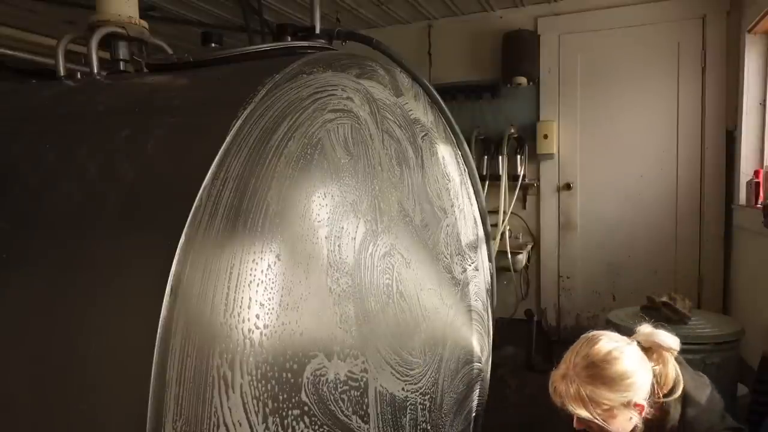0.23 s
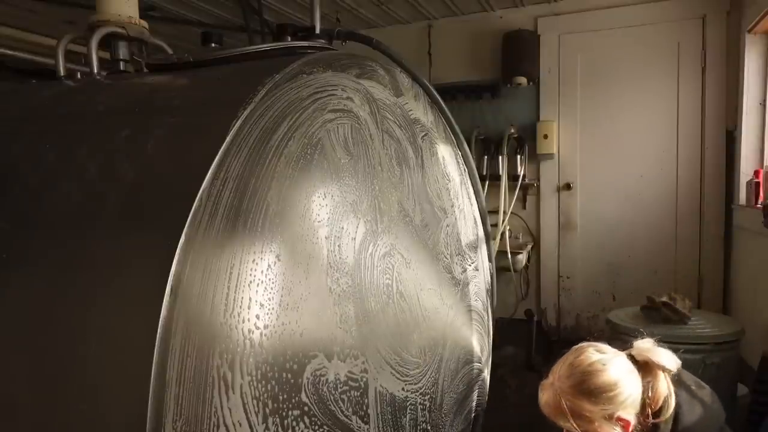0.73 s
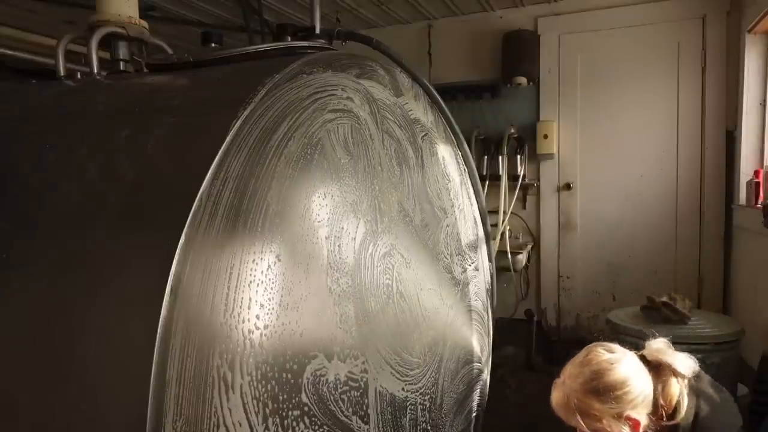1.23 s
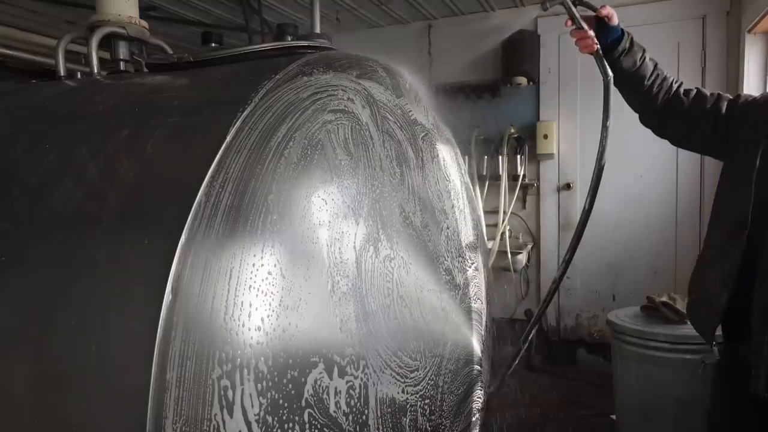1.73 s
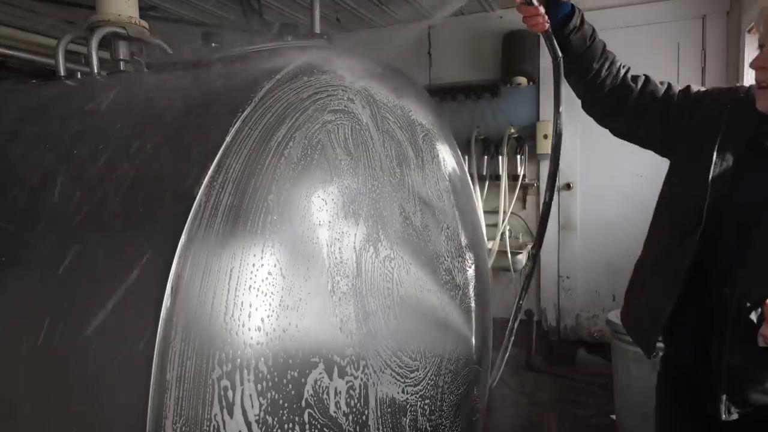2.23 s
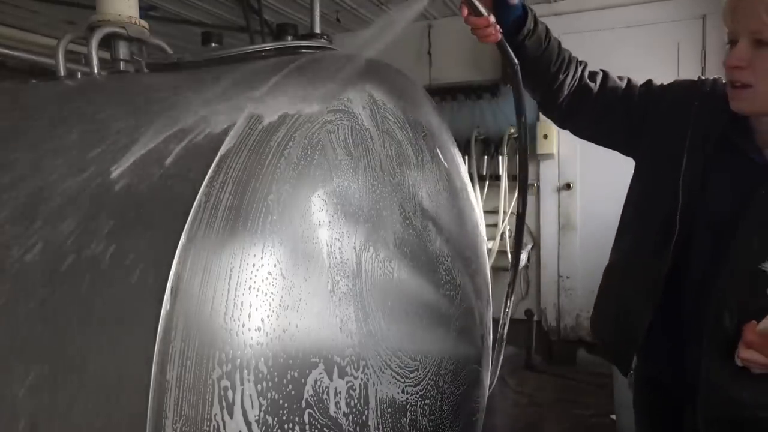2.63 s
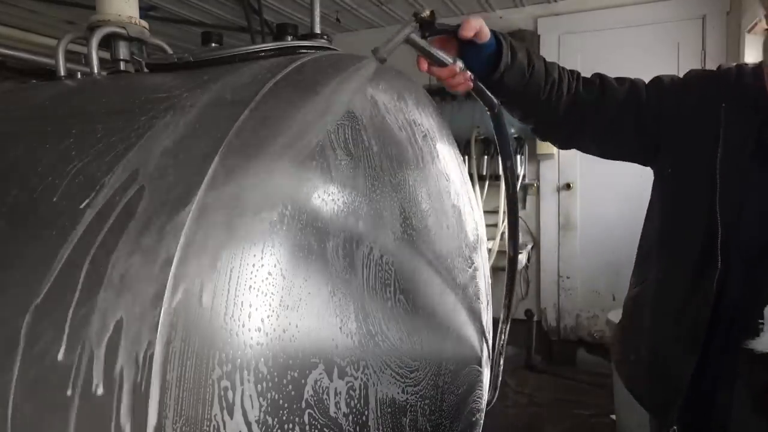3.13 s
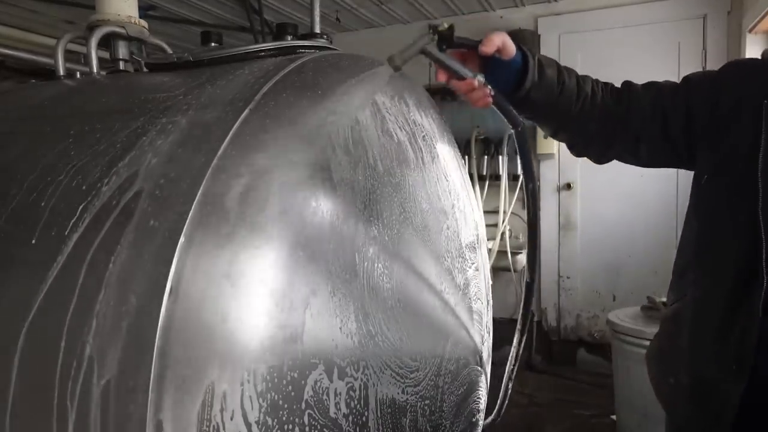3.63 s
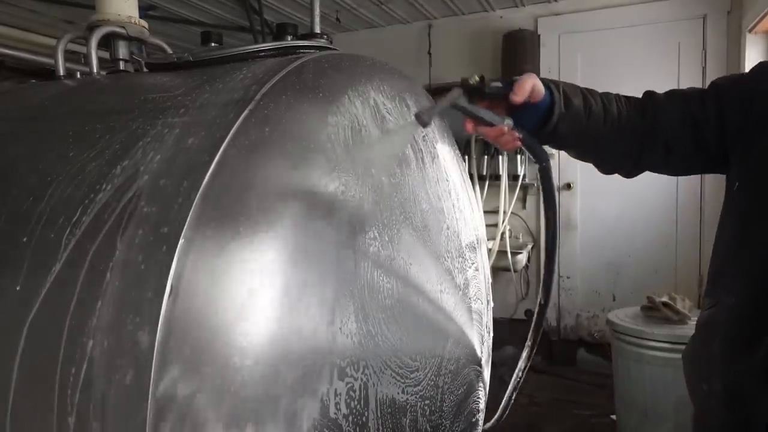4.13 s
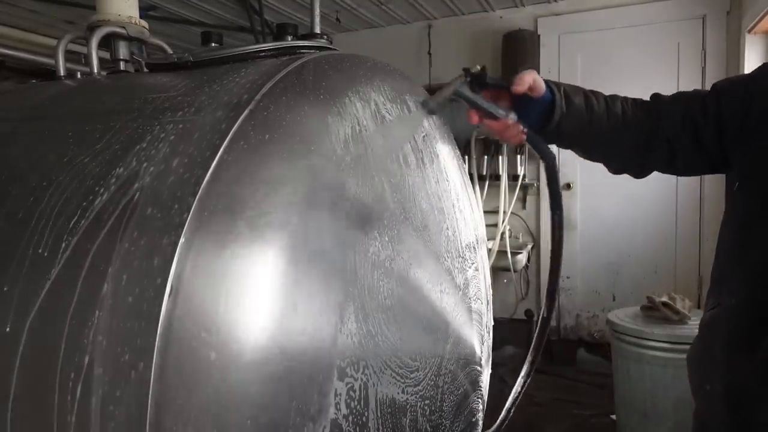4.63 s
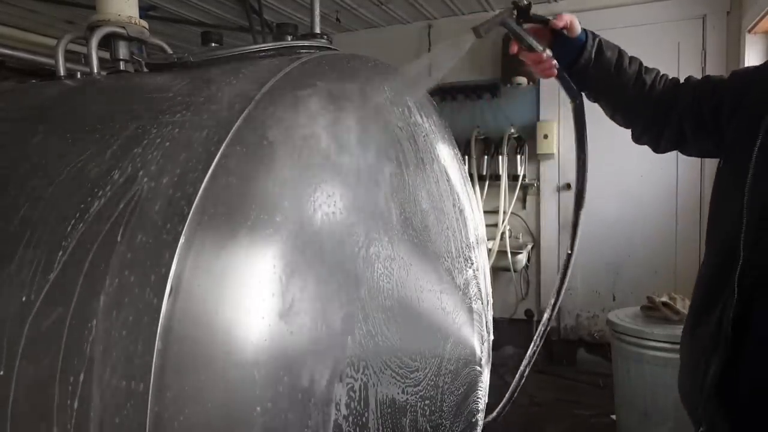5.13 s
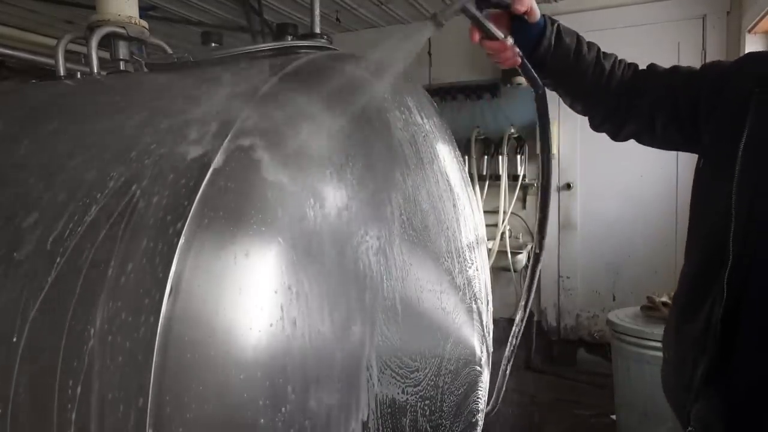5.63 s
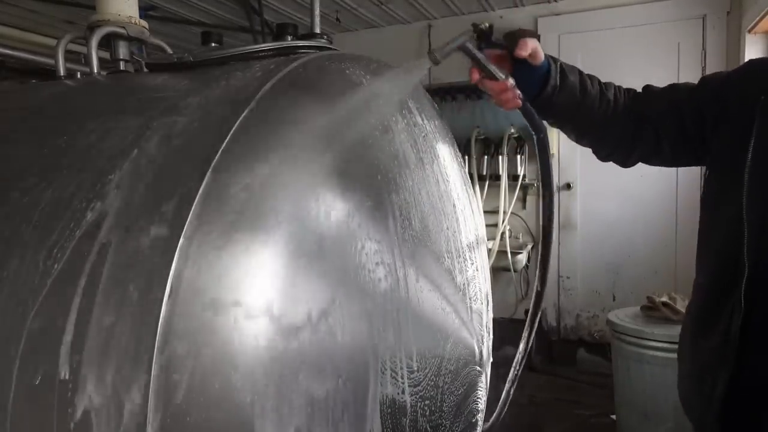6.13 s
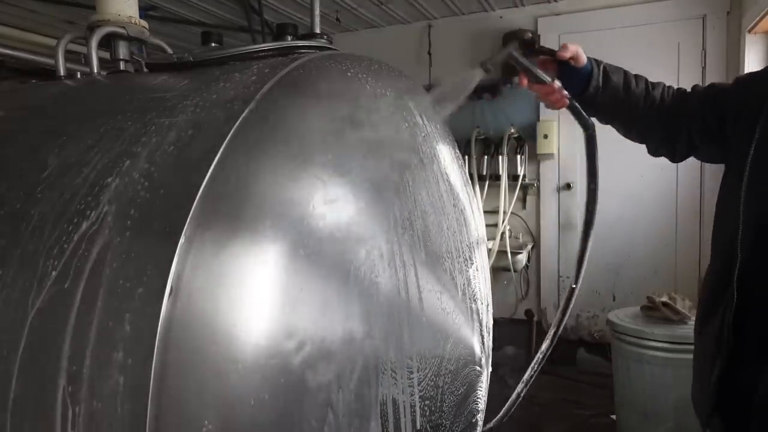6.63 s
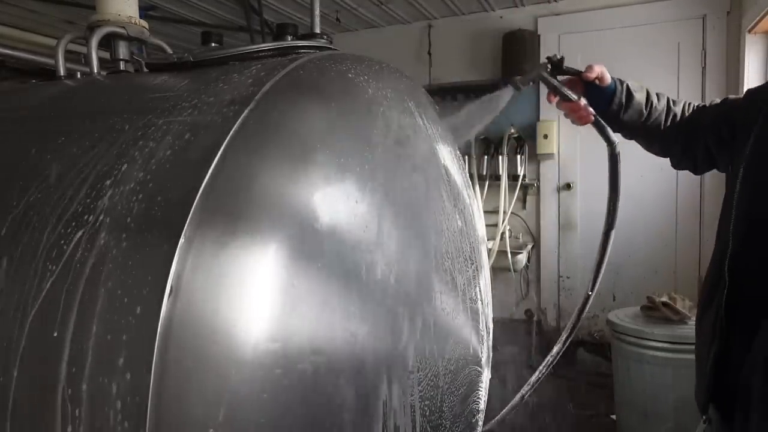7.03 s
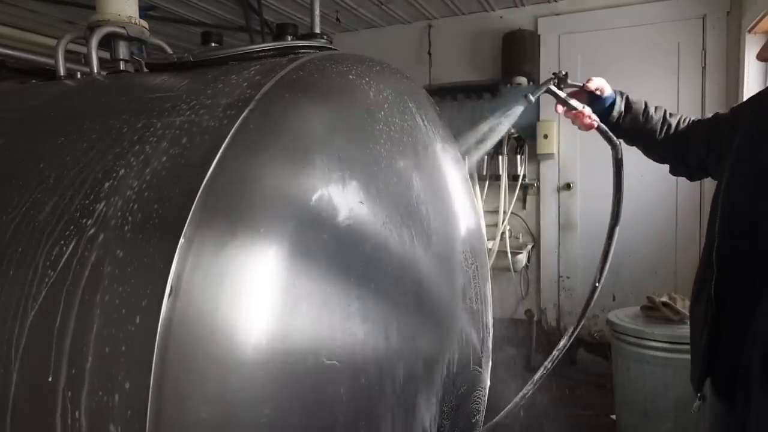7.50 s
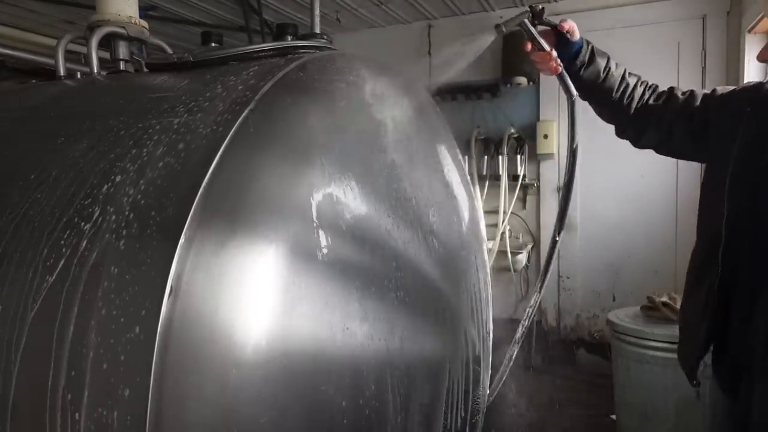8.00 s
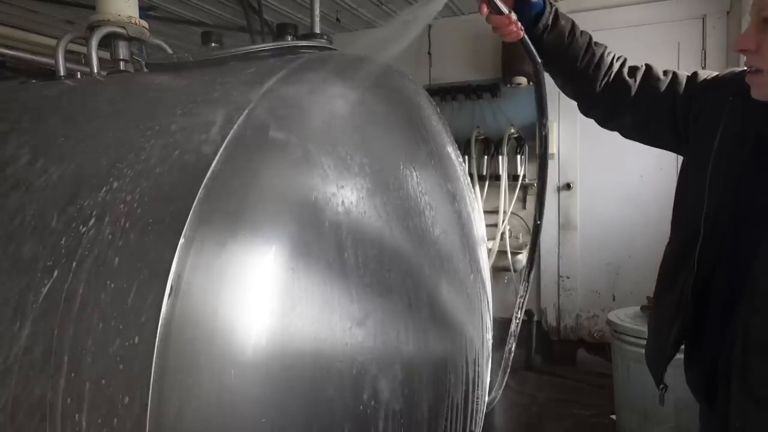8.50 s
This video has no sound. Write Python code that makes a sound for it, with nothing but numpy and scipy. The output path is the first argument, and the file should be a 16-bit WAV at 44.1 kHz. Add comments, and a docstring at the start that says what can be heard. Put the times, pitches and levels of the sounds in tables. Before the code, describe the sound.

A hard tool clatters at once, then wet bristles scrub in short strokes, ending in several hollow knocks. After a brief dip, a hose sprays a steel tank: dense splash, spatter and fizzing mist, with sharp drop ticks, water slaps and a fluttering metallic ring that grows as the jet hits squarely. Close, nearly mono pickup in a hard-walled dairy room.

```python
"""Bristles scrub, a hard tool clatters and blows knock; then a hose sprays a steel milk tank in a dairy room.
The brush is coloured noise in strokes; clatter and knocks are noise bursts, the knocks ringing a hollow body.
The sound fades out and in between the two. Random impacts, filtered in three bands, then make splash,
spatter and mist, and drive resonances of the steel shell; a hissing jet, splats, ticks and bumps join in.
Dense reflections from the hard walls make the small stereo width."""
import sys
import numpy as np
from scipy import signal
from scipy.fft import rfft, irfft
from scipy.io import wavfile

SR = 44100
rng = np.random.default_rng(int(sys.argv[2]) if len(sys.argv) > 2 else 0)


def put_to_file(sound):
    """Save the sound as 16-bit audio at rate SR, in the file named by the first command-line argument."""
    columns = np.atleast_2d(sound).T  # one column per channel
    safe = np.clip(columns, -1, 1)
    whole_steps = np.round(safe * 32767)
    wavfile.write(sys.argv[1], SR, whole_steps.astype(np.int16))


N = 386316
T = np.arange(N) / SR  # time, s
HZ = np.fft.rfftfreq(N, 1 / SR)

# water arriving on the tank, swelling and sinking as the nozzle is swept about: time_s, relative_level_db
FLOW = [(1.34, -27.5), (1.7, -27.5), (2.4, -29.5), (2.9, -31), (3.33, -34.5), (3.58, -29.5), (3.75, -29),
        (4.0, -28.0), (4.38, -31.5), (4.45, -31), (4.53, -29.5), (4.8, -28.5), (5.55, -28), (6.2, -29),
        (6.85, -28.5), (7.75, -27.5), (8.3, -28.0), (8.48, -28), (8.75, -27.0)]


def amp(db):
    """Level law: 20 dB is a tenfold amplitude."""
    return 10 ** (np.asarray(db) / 20)


def unit(x):
    """Normalization by mean power: scales to rms 1."""
    return x / np.sqrt(np.mean(x ** 2) + 1e-20)


def read(points, hz):
    """Interpolates a table on a logarithmic frequency axis."""
    point_hz, value = np.transpose(points)
    return np.interp(np.log(hz + 1), np.log(point_hz + 1), value)


def curves(rows):
    """Linear interpolation in time: each column of a timed table, sample by sample."""
    time_s, *columns = np.transpose(rows)
    return [np.interp(T, time_s, column) for column in columns]


def add(mix, start_s, sound):
    """Superposition: mixes a sound in at its start time."""
    part = mix[max(round(start_s * SR), 0):][:len(sound)]
    part += sound[:len(part)]


def colour(x, points):
    """Spectral shaping: weights each frequency by a table of levels."""
    return irfft(rfft(x) * amp(read(points, HZ)), N)


def high_pass(x, hz):
    """Fourth-order filter: a steep bass cut."""
    return signal.sosfilt(signal.butter(4, hz, "high", fs=SR, output="sos"), x)


def resonate(x, hz, width):
    """Damped resonance of peak gain 1, by a one-pole filter in a frame turning at a fixed or moving pitch."""
    turn = np.exp(2j * np.pi * np.cumsum(hz * np.ones(len(x))) / SR)
    pole = np.exp(-np.pi * width / SR)
    baseband = signal.lfilter([1 - pole], [1, -pole], x / turn + 1e-18)
    return 2 * (turn * baseband).real


def ring(x, hz, width):
    """Cascaded resonance: two equal stages steepen the skirts."""
    return resonate(resonate(x, hz, width), hz, width)


def wander(top_hz):
    """Low-passed noise: slow fluctuation of rms 1."""
    weight = (HZ > 2) / (1 + (HZ / top_hz) ** 2)
    return unit(irfft(rfft(rng.standard_normal(N)) * weight, N))


def drops(per_s, spread_db):
    """Shot noise: impacts at random moments, most of them small and a few large."""
    size = amp(spread_db * np.minimum(rng.exponential(1, N), 6))
    sign = rng.choice([-1, 1], N)
    lands = rng.random(N) < per_s / SR
    return unit(size * sign * lands)


def patter(points, per_s, spread_db):
    """Filtered shot noise: a train of impacts with the colour of what they land on."""
    return unit(colour(drops(per_s, spread_db), points))


def dying(hz, length, wet_db):
    """Exponential decay: a blow's own quick decay, then the diffuse room tail, added as powers."""
    # reverberation of the room: pitch_hz, t60_s
    reverb = [(150, 0.6), (500, 1), (2000, 0.48), (5000, 0.67), (14000, 0.17)]
    t, length = T[:SR], max(length, .001)
    room_s = read(reverb, hz) / np.log(1000)
    build_up = 1 - np.exp(-t / length)
    tail = amp(wet_db) ** 2 * length / room_s * build_up * np.exp(-2 * t / room_s)
    return np.sqrt(np.exp(-2 * t / length) + tail)


def burst(hz, width, length, wet_db):
    """Impulsive excitation: narrow-band noise that starts at once and dies away in the room."""
    return unit(ring(rng.standard_normal(SR), hz, width)) * dying(hz, length, wet_db)


def echoes(x, fade_s):
    """Diffuse reflection: dense echoes from hard walls, with the energy of one full-strength echo in all."""
    t = T[:SR // 4]
    taps = rng.standard_normal(len(t)) * np.exp(-t / fade_s) * (t > .003)
    return signal.fftconvolve(x, taps / np.linalg.norm(taps))[:N]


def follow(usual_db, by_flow, by_drum):
    """Level dependence: a layer follows the flow and the force on the shell, in dB per dB."""
    # how hard the jet drums the shell, highest when it meets the end wall squarely: time_s, relative_level_db
    force = [(1.34, -37.5), (1.9, -36.5), (2.5, -51.5), (3.38, -43), (3.7, -39.5), (4.0, -37), (4.45, -38),
             (4.7, -35.0), (5.15, -33.0), (5.55, -41.5), (6.0, -39.5), (6.7, -30.5), (7.3, -29),
             (8.05, -30), (8.38, -38.5), (8.75, -41.5)]
    usual_flow_db, usual_force_db = -29, -38
    (flow_db,), (force_db,) = curves(FLOW), curves(force)
    return usual_db + by_flow * (flow_db - usual_flow_db) + by_drum * (force_db - usual_force_db)


def room_noise():
    """Stationary noise: a low room sound shaped by its spectrum."""
    # low room noise: pitch_hz, relative_db_per_hz
    floor_spectrum = [(15, -59), (25, -62), (66, 1), (113, -5.5), (152, 5), (243, -5), (288, 2.5),
                      (450, -3.5), (580, -25), (990, -120)]
    return amp(-56) * unit(colour(rng.standard_normal(N), floor_spectrum))


def bumps():
    """Damped oscillation: the hose bumps softly as it is swung round."""
    # bumps of the hose: start_s, level_db, pitch_hz
    hose_bumps = [(2.69, -40, 235), (2.746, -32, 172), (2.779, -33, 170)]
    out = np.zeros(N)
    for start_s, db, hz in hose_bumps:
        tone = np.sin(2 * np.pi * hz * T[:SR])
        add(out, start_s, amp(db) * tone * dying(hz, length=.01, wet_db=-12))
    return high_pass(out, hz=90)


def clatter():
    """Modal excitation: a hard tool lands and bounces, each impact a set of short ringing bands."""
    # landings of the tool: start_s, relative_level_db
    landings = [(.001, -13.5), (.015, -22), (.038, -23), (.059, -21.5)]
    # ring of the tool: pitch_hz, stage_width_hz, relative_level_db
    tool_modes = [(670, 220, -17.5), (990, 460, -19.5), (2083, 88, -1.5), (2320, 1240, -2), (2900, 270, -8)]
    out = np.zeros(N)
    for start_s, db in landings:
        for hz, width, mode_db in tool_modes:
            add(out, start_s, amp(db + mode_db - 2) * burst(hz, width, length=0.0056, wet_db=5.0))
    return out


def knocks():
    """Forced resonance: blows ring a hollow body; the higher their centre, the wider their band."""
    # knocks of the brush: start_s, relative_level_db, centre_hz
    strikes = [(.919, -16.5, 800), (.943, -28.5, 280), (1.027, -23, 610), (1.055, -24.5, 270),
               (1.106, -10, 1480)]
    # resonances of the hollow body: pitch_hz, width_hz, relative_level_db
    body_modes = [(164, 34, -19), (254, 17, 8.5), (357, 15, 6), (575, 28, 5), (675, 55, -2),
                  (1030, 110, -2), (1570, 140, 2), (1880, 170, 3), (3800, 360, 11.5)]
    decay_cycles = 8.3  # decay time constant in cycles: low blows last longer
    low_share = 0.44  # little sounds below this share of the centre
    blows = np.zeros(N)
    for start_s, db, hz in strikes:
        blow = burst(hz, 1.4 * hz, decay_cycles / hz, wet_db=-2)
        add(blows, start_s, amp(db) * high_pass(blow, low_share * hz))
    body = sum(amp(db) * resonate(blows, hz, width) for hz, width, db in body_modes)
    return high_pass(.5 * blows + 0.54 * body, hz=122)  # too small to radiate deep bass


def brush():
    """Friction noise: wet bristles flick and hiss under each stroke, and rasp where they press."""
    # hiss of the bristles: pitch_hz, relative_db_per_hz
    hiss_spectrum = [(300, -22), (700, -16), (1500, -8.5), (3000, 0), (4300, 3), (6000, 2), (9000, -0.5),
                     (12000, -3.5), (16000, -10.5)]
    # rasp of the bristles: pitch_hz, relative_db_per_hz
    rasp_spectrum = [(150, -14), (260, -4.5), (480, -14.5), (700, -6.5), (1200, -8.5), (1700, -2.5),
                     (2050, 2.5), (3000, -0.5), (4200, -2), (8000, -18)]
    # brush strokes: start_s, push_s, hold_s, relative_level_db, relative_rasp_db
    brush_strokes = [(0.08, 0.037, 0.18, -34, -2), (0.435, 0.075, 0.017, -35.5, -4.5),
                     (0.626, 0.038, 0.041, -35.5, -7.5), (0.859, 0.039, 0.0089, -27, -8.5),
                     (0.997, 0.067, 0.057, -31.5, -3.5)]
    release_db_per_s = 52.5  # for a stroke listed at -35 dB
    snap_per_db = 0.084  # harder strokes end faster, exponentially with their level
    hiss, rasp = np.zeros(N), np.zeros(N)
    for start_s, push_s, hold_s, db, rasp_db in brush_strokes:
        release = release_db_per_s * np.exp(snap_per_db * (db + 35))
        push = np.clip((T - start_s) / push_s, 0, 1)
        stroke = push * amp(db - release * np.maximum(T - start_s - push_s - hold_s, 0))
        hiss = np.hypot(hiss, stroke)  # overlapping strokes add as powers
        rasp = np.hypot(rasp, amp(rasp_db) * stroke)
    hiss = hiss * amp(2.0) * patter(hiss_spectrum, per_s=14000, spread_db=2)
    rasp = rasp * amp(1.5) * patter(rasp_spectrum, per_s=10000, spread_db=2.0)
    return hiss + rasp


def ticks():
    """Impulsive radiation: stray drops by the microphone click sharply, a few large and many small."""
    # large drops close by: start_s, relative_level_db
    large_drops = [(2.5411, -10), (2.6793, -9), (2.798, -8), (3.023, -9), (3.3826, -11.5), (3.7785, -13),
                   (6.542, -8), (7.826, -7), (8.521, -7)]
    out, t = np.zeros(N), T[:SR // 200]
    for start_s, db in large_drops:
        hz = 10500 * rng.uniform(.85, 1.15)
        add(out, start_s, amp(db + 4) * np.sin(2 * np.pi * hz * t) * np.exp(-t / .00016))
    small = rng.random(N) * (rng.random(N) < 30 / SR)  # about 30 a second
    flow_db, = curves(FLOW)  # small drops are louder when the flow is strong
    return out + amp(flow_db - 16.0) * unit(ring(small, hz=10500, width=3500))


def splats():
    """Band-limited impact noise: short slaps of water swell quickly, with the room after them."""
    # bright splats: start_s, relative_level_db, centre_hz, stage_width_hz
    slaps = [(3.579, -19.5, 5430, 7000), (3.97, -19.5, 3450, 2200), (4.353, -23.5, 5140, 2200),
             (4.44, -22.5, 8000, 4000), (4.531, -22, 5070, 2000), (4.571, -22, 4700, 3000),
             (5.08, -21.5, 2850, 1100), (5.198, -23, 4700, 5000), (5.8, -24, 3400, 3000),
             (6.903, -20, 7300, 3500), (7.067, -20.5, 4130, 3500), (7.115, -19.5, 7360, 5000),
             (7.162, -19.5, 4130, 1800), (7.296, -18.5, 5170, 4500), (7.463, -16, 4900, 4500),
             (7.567, -19, 5560, 1800)]
    rise_s, decay_s = 0.0056, .013
    out, swell = np.zeros(N), np.minimum(T[:SR] / rise_s, 1)
    for start_s, db, hz, width in slaps:
        add(out, start_s, amp(db) * swell * burst(hz, width, decay_s, wet_db=1.0))
    return high_pass(out, hz=1400)


def jet():
    """Turbulence noise: water leaving the nozzle makes a broad, fuzzy whistle."""
    # passes in which the open jet skims the top of the tank: start_s, end_s, level_db
    passes = [(1.6, 2.2, -34.5), (5.3, 5.65, -33.5), (7.75, 8.6, -34.5)]
    swing_db_per_s = 26  # the hiss fades this fast on either side of a pass
    level = sum(amp(db - swing_db_per_s * abs(T - np.clip(T, start, end))) for start, end, db in passes)
    return level * unit(ring(rng.standard_normal(N), hz=4520, width=1300))


def shell():
    """Forced plate resonance: the jet drums wet steel; the upper ring shifts and flutters with the spot struck."""
    # lower ring of the shell: pitch_hz, first_stage_width_hz, relative_level_db
    lower_modes = [(584.6, 32, 5), (633, 31, 2.5)]
    # upper ring at the spot that the jet strikes: time_s, central_pitch_hz
    spot_pitch = [(1.62, 1190), (1.82, 1510), (2.3, 1400), (4.3, 1270), (4.7, 1370), (4.95, 1340),
                  (7.38, 1370), (7.62, 1520), (7.88, 1506), (8.05, 1360)]
    spot_wander = 0.028  # rms share of the pitch at the usual force
    wander_halves_db = 10  # this much more force halves the wander: a square hit holds the pitch steadier
    upper_db = follow(usual_db=-40.5, by_flow=0, by_drum=1.31)
    lower_db = follow(usual_db=-52.0, by_flow=0, by_drum=1.58)
    central_hz, = curves(spot_pitch)
    pelting = drops(per_s=6000, spread_db=1.5) * amp(1.0 * wander(top_hz=35))
    extra_force_db = follow(usual_db=0, by_flow=0, by_drum=1)
    loose = spot_wander * .5 ** (extra_force_db / wander_halves_db)
    spot_hz = central_hz * (1 + loose * wander(top_hz=15))
    upper = unit(resonate(resonate(pelting, spot_hz, width=120), spot_hz, width=700))
    lower = np.zeros(N)
    for hz, width, db in lower_modes:
        lower += amp(db) * resonate(resonate(pelting, hz, width), hz, width=410)
    return amp(upper_db) * upper + amp(lower_db) * unit(lower)


def spray():
    """Impact noise of many drops: heavy ones splash, smaller ones spatter, mist fizzes; all surge together."""
    # colour of the heavy drops: pitch_hz, relative_db_per_hz
    splash_spectrum = [(100, -39), (300, -11.5), (480, -9), (850, -4), (1250, 0), (1800, 2), (3200, 2.5),
                       (5000, 0.5), (7000, -12.5), (12000, -19)]
    # colour of the smaller drops: pitch_hz, relative_db_per_hz
    spatter_spectrum = [(1500, -31), (3500, -15), (5500, -1), (8000, 2), (10500, 1), (15000, -8.5)]
    # colour of the mist: pitch_hz, relative_db_per_hz
    mist_spectrum = [(3000, -32), (7000, -12.5), (10000, -5.5), (13500, 1), (16000, -2)]
    splash_db = follow(usual_db=-32.5, by_flow=0.59, by_drum=0.095)
    glancing_db = follow(usual_db=-34.5, by_flow=.3, by_drum=-0.13)
    rebound_db = follow(usual_db=-40, by_flow=0.43, by_drum=1.41)  # a square hit throws more drops back
    flow_db, = curves(FLOW)
    surge = wander(top_hz=25)  # the uneven jet
    splash = amp(splash_db + 0.7 * surge) * patter(splash_spectrum, per_s=12000, spread_db=2.0)
    spatter_level = np.hypot(amp(glancing_db), amp(rebound_db))
    spatter_level = spatter_level * amp(0.72 * surge + 1.0 * wander(top_hz=11))
    spatter = spatter_level * patter(spatter_spectrum, per_s=12000, spread_db=2.5)
    mist = amp(flow_db + 2.0 + 0.97 * surge) * patter(mist_spectrum, per_s=18000, spread_db=4.0)
    direct = splash + spatter + mist
    return direct + amp(-10) * echoes(direct, fade_s=.045)


def microphone_pair(mid):
    """Mid-side stereophony: reflections reach the two microphones a little differently."""
    # stereo width: pitch_hz, side_against_mid_db
    side_spectrum = [(60, -19), (200, -17), (600, -15.5), (1300, -17), (2500, -21.5), (5000, -24),
                     (13000, -28.5)]
    side = colour(echoes(mid, fade_s=0.011), side_spectrum)
    return np.array([mid + side, mid - side])


def scene():
    """Superposition of sources: scrubbing fades out, spraying fades in; the sound is nearly mono."""
    turn_s, fade_out_s, fade_in_s = 1.302, .04, .036
    floor = room_noise()
    scrubbing = amp(-2) * floor + clatter() + knocks() + brush()
    spraying = floor + bumps() + ticks() + splats() + jet() + shell() + spray()
    before = np.clip((turn_s - T) / fade_out_s, 0, 1) * scrubbing
    after = np.clip((T - turn_s) / fade_in_s, 0, 1) * spraying
    return microphone_pair(before + after)


def record(dry):
    """Band limitation: the microphone's bass roll-off and the recorder's upper limit."""
    lean = high_pass(dry, hz=53.3)
    low_pass = signal.firwin(511, 15950, window=("kaiser", 9), fs=SR)  # edge in Hz
    return signal.oaconvolve(lean, low_pass[None], "same")


dry = scene()
out = record(dry)
put_to_file(out)
```